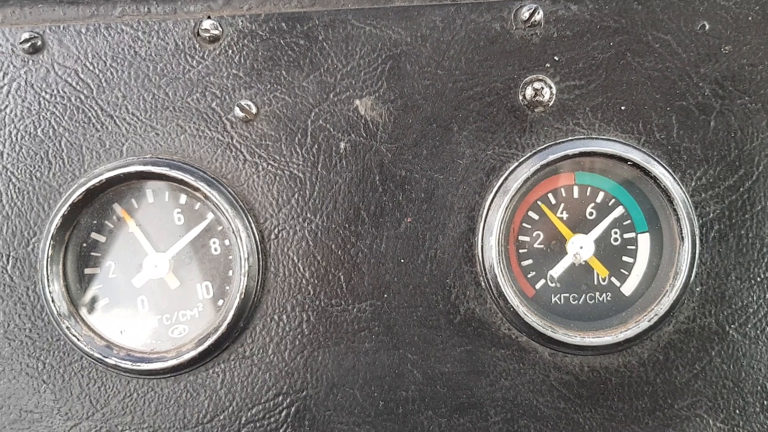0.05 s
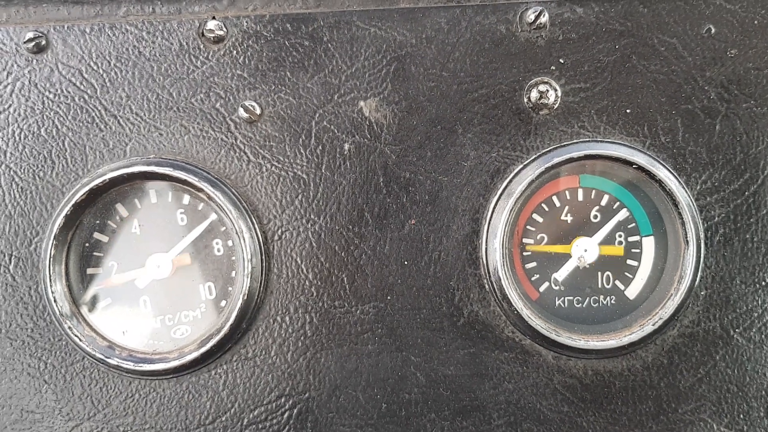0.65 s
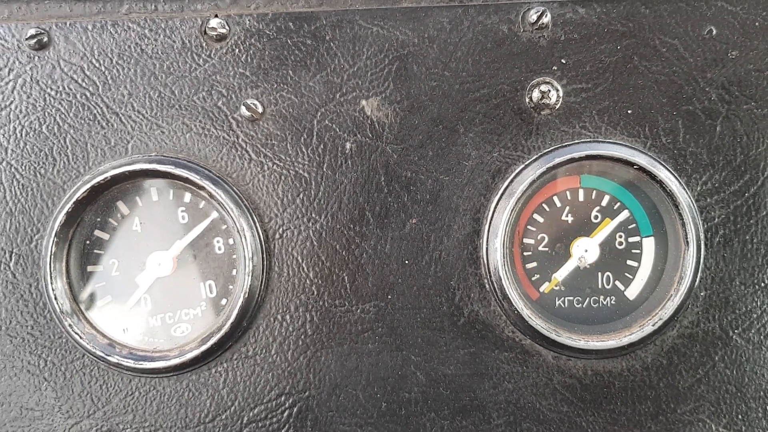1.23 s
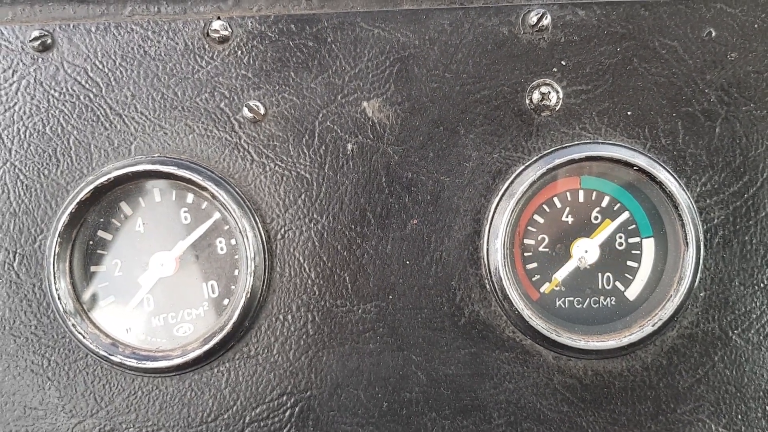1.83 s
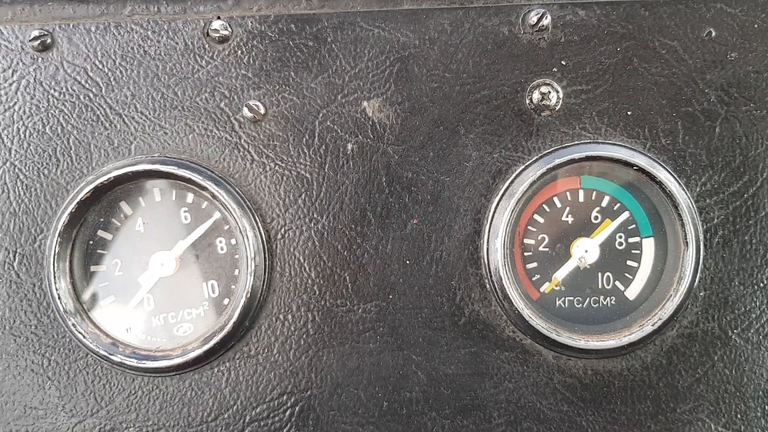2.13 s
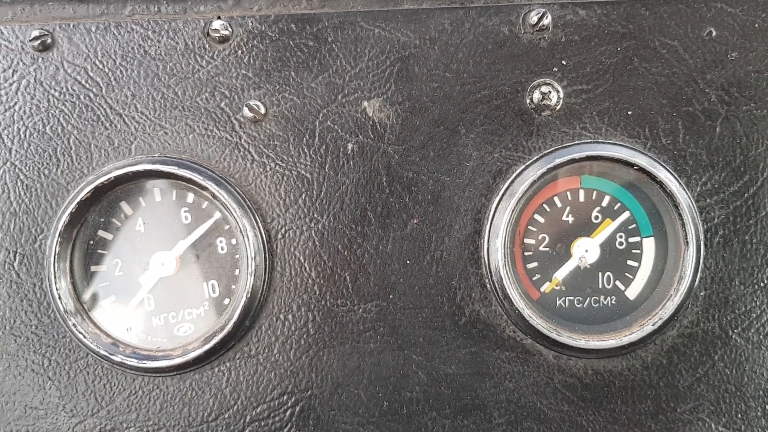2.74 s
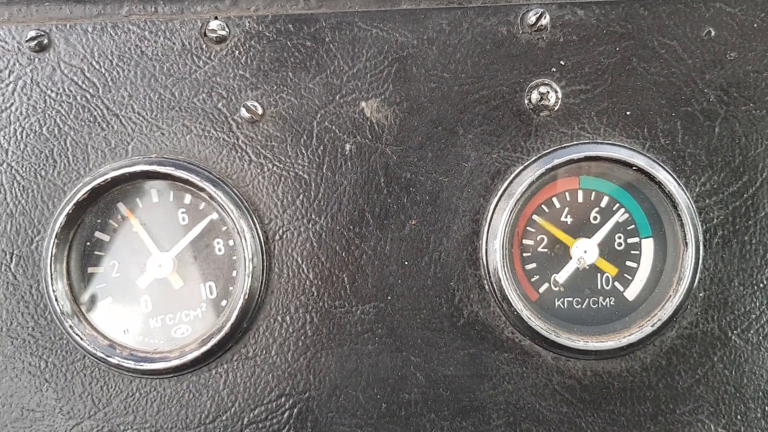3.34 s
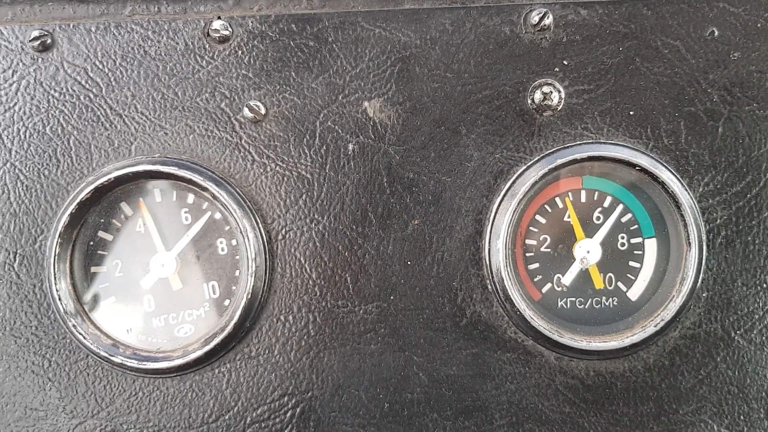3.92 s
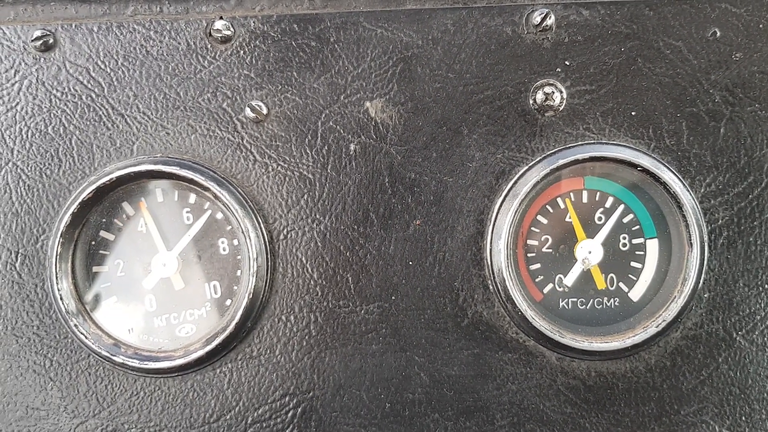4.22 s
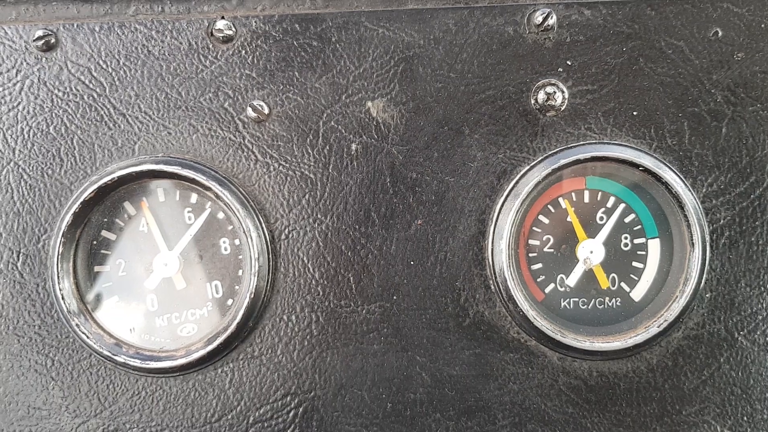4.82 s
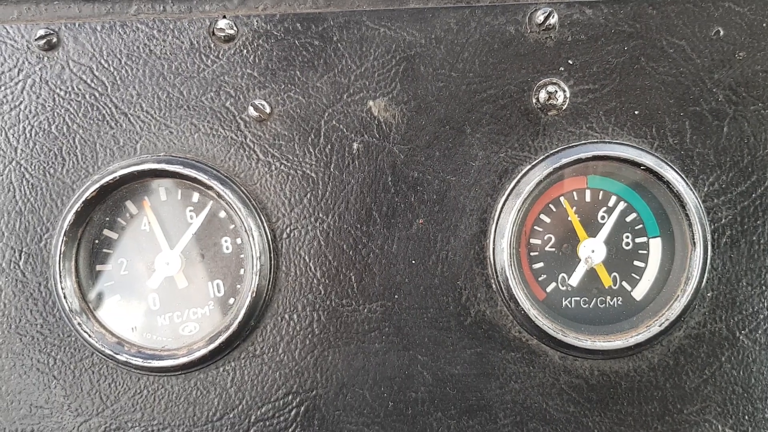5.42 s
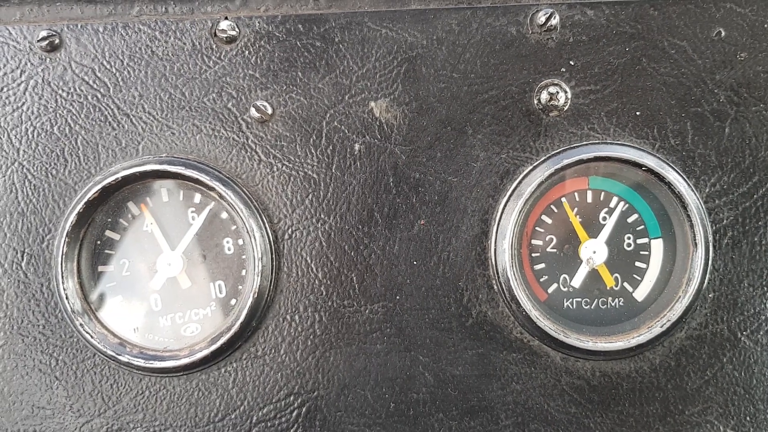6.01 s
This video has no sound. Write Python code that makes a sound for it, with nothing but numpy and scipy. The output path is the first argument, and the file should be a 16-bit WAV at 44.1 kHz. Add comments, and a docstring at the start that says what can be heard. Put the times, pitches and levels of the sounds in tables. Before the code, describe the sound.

A diesel engine idles with a deep, steady drone, heard from inside a vehicle cab. A thin air leak gives way to a loud hiss as the brake releases, followed by two spits with faint high whistles. After a few soft puffs, three hard blasts of air come in quick succession. The leak then returns and slowly grows. The air sounds are close, with a short, tight echo.

```python
"""A thin hiss of leaking air over a deep drone: the cab of an idling diesel vehicle with its air brake on.
The brake is released: the cylinders empty with a loud hiss, then the valve spits twice and whistles.
The brake is put on again: after a few soft puffs, three hard blasts of air refill the cylinders.
While they hold pressure the leak hisses on and slowly grows. The engine drones through the floor
the whole time."""
import sys
import numpy as np
from scipy import signal
from scipy.fft import rfft, irfft
from scipy.io import wavfile
from scipy.ndimage import uniform_filter1d

SR = 44100
rng = np.random.default_rng(int(sys.argv[2]) if len(sys.argv) > 2 else 0)


def inscribe(sig):
    """Save sig as 16-bit PCM at rate SR to the path in sys.argv[1].

    A 1-D sig is mono; a 2-D sig holds one channel per row.
    Samples are clipped to [-1, 1] before scaling.
    """
    pcm = np.round(np.clip(np.atleast_2d(sig).T, -1, 1) * 32767)
    wavfile.write(sys.argv[1], SR, pcm.astype(np.int16))


N = 271656
TIME = np.arange(N) / SR
FREQ = np.maximum(np.fft.rfftfreq(N, 1 / SR), 1)
SIDES = np.array([[1], [-1]])  # plus for left, minus for right

# puffs and blasts that fill the cylinders; more tilt sounds brighter
# (time [s], opening time [s], level [dB], tilt [dB per octave])
PUFFS = [(2.366, 0.023, -40, -1), (2.835, 0.039, -46, 7), (2.875, 0.037, -30, -4.5),
         (2.92, 0.0094, -14.5, 3), (2.943, 0.016, -13.5, 0.1), (3.028, 0.034, -20, -0.5),
         (3.095, 0.014, -12, 0.5)]
# tone of the feed valve: (frequency [Hz], relative level [dB])
FEED_TONE = [(380, -2.5), (470, -2), (720, -2), (900, 0), (1450, -2.5), (2000, -3.5), (2900, -1.5),
             (3700, -3.5), (5200, -6), (8500, -12.5), (11200, -14), (13500, -20), (16000, -27)]
# pitches at which that valve and its pipe ring: (frequency [Hz], width [Hz], boost [dB])
FEED_RESONANCES = [(480, 77, 5), (788, 50, 6.5), (904, 59, 6.5), (2607, 40, 8.5), (2810, 61, 5),
                   (3090, 37, 4), (3460, 41, 6), (3680, 50, 5.5), (4170, 50, 8)]

# air let out of the exhaust port:
# (time [s], opening time [s], hold time [s], level before the surge is added [dB], tilt [dB per octave])
VENTS = [(0.411, 0.047, 0.24, -32, 0), (2.55, 0.14, 0.034, -50.5, 5)]
# tone of the exhaust port: (frequency [Hz], relative level [dB])
EXHAUST_TONE = [(1100, 2.5), (2200, -3), (3200, 1), (4900, -1), (6200, -1), (7700, -8.5), (9300, -7),
                (10400, 1), (11900, -6.5), (13500, -4.5), (16000, -8)]

# ticks and spits during release: (time [s], opening time [s], level [dB], tilt [dB per octave])
SPITS = [(.394, 0.0069, -38, 4), (1.059, .05, -23.5, 0.4), (1.385, 0.043, -35, -1.5),
         (1.435, 0.039, -27, -2), (1.46, 0.059, -29, 1)]
# tone of the seat, the rim that the valve shuts against: (frequency [Hz], relative level [dB])
SEAT_TONE = [(400, 3.5), (700, 0.5), (1020, 4.5), (1500, -4), (2400, -1.5), (3500, -1.5), (5200, -6.5),
             (7500, -7), (11500, -8.5), (12800, -12), (16000, -19)]
# airy whistles at the seat: (time [s], frequency [Hz], half width [Hz], level [dB])
WHISTLES = [(1.071, 10900, 480, -31), (1.498, 9210, 200, -32), (1.505, 7650, 250, -40)]

# when the brake holds pressure: (start [s], end [s], starting hiss level [dB], starting rush level [dB])
BRAKE_HOLDS = [(-.2, 0.462, -47, -39), (3.176, 6.3, -48.5, -42)]
# tone of the hiss at the leaking gap: (frequency [Hz], relative level [dB])
GAP_TONE = [(1500, -4), (2800, 2.5), (4200, 7), (5500, -2), (7600, -4), (9000, -1.5), (10500, 0),
            (12500, -3.5), (14500, -6), (16000, -9.5)]
# pitches at which the gap rings: (frequency [Hz], width [Hz], boost [dB])
GAP_RESONANCES = [(2800, 98, 13), (6660, 60, 10), (8200, 195, 7.5), (9787, 260, 6.5), (11000, 440, 2.5),
                  (11940, 80, 8), (13100, 224, 6)]
# tone of the rush in the pipe that feeds the leak: (frequency [Hz], relative level [dB])
PIPE_TONE = [(250, -17), (480, 5.5), (660, 8), (820, 7), (950, 2.5), (1250, 2), (1450, 1.5), (1950, -0.5),
             (2700, -10.5), (6000, -16)]

# hums of the engine and the parts it drives: (frequency [Hz], level [dB], waver [dB])
ENGINE_HUMS = [(27, -46, 1), (31.3, -40, 7), (40.1, -34.5, 1), (50.8, -44, 6), (55.05, -39.5, 3),
               (109.1, -30.5, 0.55), (137.5, -30.5, 2.5), (149.2, -39.5, 0), (160.8, -46, 2),
               (173.5, -41, 6), (200, -46, 4.5), (212.5, -43.5, 1.5), (264.5, -48, 3), (274, -33.5, 1)]
# tone of the cab's rumble: (frequency [Hz], relative level [dB])
RUMBLE_TONE = [(14, -17.5), (28, -6), (45, 5), (100, -2.5), (138, 8), (185, -1), (295, 2), (330, -9),
               (400, -4), (620, -10.5), (1000, -17), (1250, -22)]
# tone of the engine noise that comes through the air: (frequency [Hz], relative level [dB])
CLATTER_TONE = [(400, -40), (1000, -3.5), (1600, -0.5), (2500, -8), (4500, -14.5), (8000, -25.5),
                (11500, -29), (14000, -37.5), (16000, -43)]
# pitches that the cab's air spaces and panels boost or weaken: (frequency [Hz], width [Hz], boost [dB])
CAB_RESONANCES = [(351, 19, 5), (500, 57, 4), (727, 22, 5.5), (847, 32, 7), (970, 23.2, 2), (1066, 23, 8.5),
                  (1117, 4.7, -9)]

# how alike left and right sound: (frequency [Hz], correlation [-1 to 1])
STEREO_LIKENESS = [(40, 0.91), (150, 0.98), (280, 0.92), (500, 0.68), (900, 0.5), (1350, -0.58),
                   (2200, 0.19), (3200, -0.081)]
# which side is louder: (frequency [Hz], left minus right [dB])
STEREO_BALANCE = [(100, 1.25), (250, -0.5), (1000, -2), (2500, -2), (8000, -3), (13000, -4)]


def blasts(fall_s=0.055, ring_hz=925, ring_width_hz=11.4, ring_db=4):
    """The feed valve snaps open; every puff dies away at the same pace and leaves the pipe ringing."""
    events = [(start, rise, 0, fall_s, db, tilt) for start, rise, db, tilt in PUFFS]
    air = jets(events, colour(FEED_TONE, FEED_RESONANCES), bend=1.12, treble_haste=0.22)
    ring = signal.lfilter(*signal.iirpeak(ring_hz, ring_hz / ring_width_hz, fs=SR), air)
    return air + undb(ring_db) * ring


def venting(surge_db=6.5, surge_s=.085, fall_s=.22):
    """Pent-up air surges out of the exhaust port, flows steadily and fades as the cylinders empty."""
    events = [(start, rise, hold, fall_s, db, tilt) for start, rise, hold, db, tilt in VENTS]
    air = jets(events, colour(EXHAUST_TONE), bend=1.17, treble_haste=0.053)
    surge = sum((TIME > start) * np.exp(-((TIME - start) / surge_s) ** 2) for start, *_ in VENTS)
    return air * undb(surge_db * surge)


def spits(fall_ratio=1.58):
    """Air spits out as the valve lifts and settles again; the slower it opens, the slower it shuts."""
    events = [(start, rise, 0, fall_ratio * rise, db, tilt) for start, rise, db, tilt in SPITS]
    return jets(events, colour(SEAT_TONE), bend=1.33, treble_haste=0.25)


def whistles(rise_s=0.019, fall_s=0.057):
    """The nearly shut valve sings in narrow bands of noise."""
    out = np.zeros((2, N))
    for start, hz, half_width, db in WHISTLES:
        band = noise(1 / (1 + ((FREQ - hz) / half_width) ** 2))
        span = slice(int(start * SR), int((start + rise_s + 3 * fall_s) * SR))
        flow = gush(TIME[span] - start, rise_s, 0, fall_s, bend=1.2)
        out[:, span] += undb(db) * flow * band[:, span]
    return out


def leak(hiss_db_per_s=1.42, rush_growth_db=11, rush_settle_s=1.83, flicker_db=0.72):
    """Air rushes along a pipe and hisses out of a narrow gap, louder the longer the brake is on."""
    hiss = cab_echo(noise(colour(GAP_TONE, GAP_RESONANCES)), echo_db=-2.5)
    rush = cab_echo(noise(colour(PIPE_TONE, CAB_RESONANCES)), echo_db=-7.5)
    out = np.zeros((2, N))
    for start, end, hiss_db, rush_db in BRAKE_HOLDS:
        age = np.clip(TIME - start, 0, end - start)
        gap = hiss * undb(hiss_db + hiss_db_per_s * age)
        pipe = rush * undb(rush_db + rush_growth_db * (1 - np.exp(-age / rush_settle_s)))
        out += plateau(start, end, rise_s=0.12, fall_s=0.03) * (gap + pipe)
    return out * undb(flicker_db * wander(15))


def engine(rumble_db=-28.5, clatter_db=-42.5, firing_hz=27.34, throb_depth=0.066, dip_db=-1.64):
    """The engine shakes the floor and panels; the noise of burning fuel throbs with each firing."""
    throb = 1 + throb_depth * np.cos(2 * np.pi * firing_hz * TIME + .5 * wander(4.1))
    rumble = noise(colour(RUMBLE_TONE, CAB_RESONANCES)) * undb(rumble_db + 0.52 * wander(3.02))
    clatter = noise(colour(CLATTER_TONE, CAB_RESONANCES)) * undb(clatter_db + 0.43 * wander(9))
    # the low sounds dip for a moment once the brake is back on
    dip = undb(dip_db * plateau(3.14, 4.47, rise_s=0.14, fall_s=0.14))
    return dip * (rumble + drone()) + cab_echo(throb * clatter, echo_db=-2.5)


def drone(drift_rad_per_db=0.18, spread_rad_per_hz=0.00093):
    """Shaft, firing and fan make wavering hums; the higher ones are less in step between left and right."""
    out = np.zeros((2, N))
    for hz, db, waver_db in ENGINE_HUMS:
        phase = 2 * np.pi * (hz * TIME + rng.random())
        phase += drift_rad_per_db * waver_db * wander(4.061)
        swell = unit(undb(waver_db * wander(6)))
        side_shift = SIDES * spread_rad_per_hz * hz * rng.choice([-1, 1])
        out += np.sqrt(2) * undb(db) * swell * np.sin(phase + side_shift)
    return out


def cab_echo(sound, echo_db, decay_s=.11):
    """Close, hard walls add a short, dense echo that differs between left and right."""
    t = TIME[:int(decay_s * SR)]
    tail = rng.standard_normal((2, len(t))) * undb(-60 * t / decay_s) * (t > .001)
    tail *= undb(echo_db) / np.sqrt(np.sum(tail ** 2, axis=1, keepdims=True))
    echo = signal.fftconvolve(sound, tail, axes=1)[:, :N]
    return (sound + echo) / np.sqrt(1 + undb(2 * echo_db))


def jets(events, gain, bend, treble_haste, flutter_db=1.0):
    """Bursts of swirling air from one opening; as the pressure drops, the high pitches die first."""
    centres_hz = 250 * 2. ** np.arange(7)
    octaves = np.log2(centres_hz / 3000)
    # split the noise into octave bands, so that each can fade at its own pace
    shares = [np.interp(np.log2(FREQ), np.log2(centres_hz), row) for row in np.eye(len(centres_hz))]
    spectrum = noise_spectrum(gain)
    bands = [irfft(spectrum * share, N) for share in shares]
    band_power = np.mean(unit(gain) ** 2 * np.array(shares), axis=1)
    out = np.zeros((2, N))
    for start, rise, hold, fall, db, tilt in events:
        span = slice(int(start * SR), int((start + rise + hold + 3 * fall) * SR))
        weights = undb(tilt * octaves)
        weights *= undb(db) / np.sqrt(band_power @ weights ** 2)
        for band, weight, octave in zip(bands, weights, octaves):
            band_fall = fall * 2 ** (-treble_haste * octave)
            out[:, span] += weight * band[:, span] * gush(TIME[span] - start, rise, hold, band_fall, bend)
    return out * undb(flutter_db * wander(130))


def gush(t, rise_s, hold_s, fall_s, bend):
    """Air flow that opens smoothly, holds, then drops 20 dB in fall_s; a bend above 1 speeds up the end."""
    opening = np.sin(np.pi / 2 * np.clip(t / rise_s, 0, 1)) ** 2
    closing = undb(-20 * np.clip((t - rise_s - hold_s) / fall_s, 0, 10) ** bend)
    return opening * closing


def plateau(start, end, rise_s, fall_s):
    """Ramp up to 1 after the start, stay there, ramp down to the end."""
    return np.clip(np.minimum((TIME - start) / rise_s, (end - TIME) / fall_s), 0, 1)


def wander(rate_hz):
    """A smooth random drift with a typical size of 1."""
    targets = rng.standard_normal(int(N / SR * rate_hz) + 3)
    times = TIME[::32]
    zigzag = np.interp(times * rate_hz + rng.random(), np.arange(len(targets)), targets)
    smooth = uniform_filter1d(zigzag, int(.5 / rate_hz / times[1]) + 1)
    return np.interp(TIME, times, unit(smooth))


def noise(gain):
    """Stereo noise with the given gain at each frequency and a typical size near 1."""
    return irfft(noise_spectrum(gain), N)


def noise_spectrum(gain):
    """Spectrum of noise from all around: left and right are alike in the bass, unrelated in the treble."""
    shared, difference = rfft(rng.standard_normal((2, N)))
    alike = np.clip(curve(STEREO_LIKENESS), -.999, .999)
    both_sides = np.sqrt(1 + alike) * shared + SIDES * np.sqrt(1 - alike) * difference
    return unit(gain) * both_sides / np.sqrt(2)


def colour(tone, resonances=()):
    """Gain at each frequency: a broad shape that fades past its ends, plus narrow peaks or dips."""
    octaves_below = np.maximum(np.log2(tone[0][0] / FREQ), 0)
    octaves_above = np.maximum(np.log2(FREQ / tone[-1][0]), 0)
    db = curve(tone) - 24 * (octaves_below + octaves_above)
    for hz, width, boost_db in resonances:
        db += boost_db / (1 + (2 * (FREQ - hz) / width) ** 2)
    return undb(db)


def curve(points):
    """Join (frequency, value) points with lines, giving each octave equal room."""
    hz, value = np.transpose(points)
    return np.interp(np.log(FREQ), np.log(hz), value)


def undb(db):
    """Turn decibels into a gain to multiply by."""
    return 10 ** (np.asarray(db) / 20)


def unit(x):
    """Scale to a typical size (root mean square) of 1."""
    return x / np.sqrt(np.mean(x ** 2))


def scene():
    """The brake's air sounds echo in the cab, over the leak and the idling engine."""
    brake = blasts() + spits() + venting() + whistles()
    return cab_echo(brake, echo_db=-4) + leak() + engine()


def record(dry, top_hz=15800):
    """The right side hears more treble; the very highest pitches are cut steeply."""
    heard = irfft(rfft(dry) * undb(SIDES * curve(STEREO_BALANCE) / 2), N)
    return signal.sosfilt(signal.ellip(10, .2, 80, top_hz, fs=SR, output="sos"), heard)


dry = scene()
out = record(dry)
inscribe(out)
```